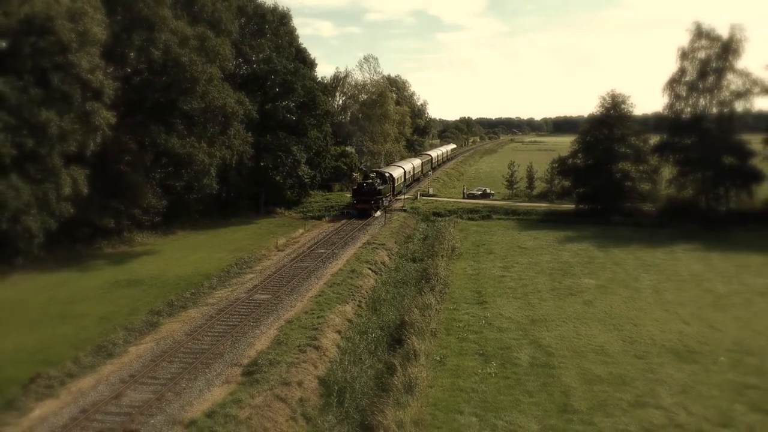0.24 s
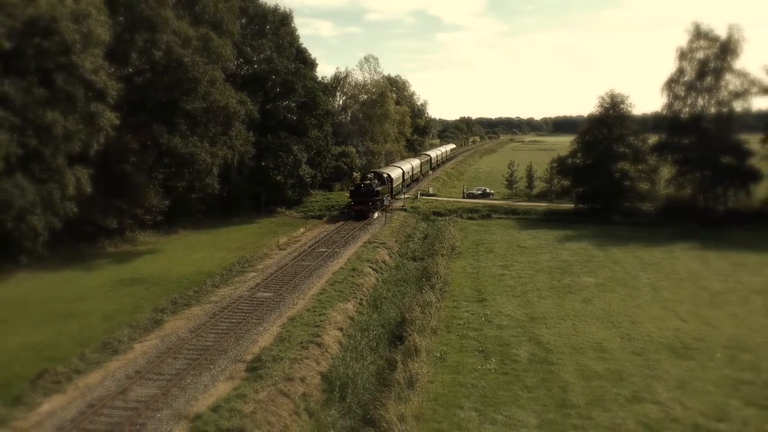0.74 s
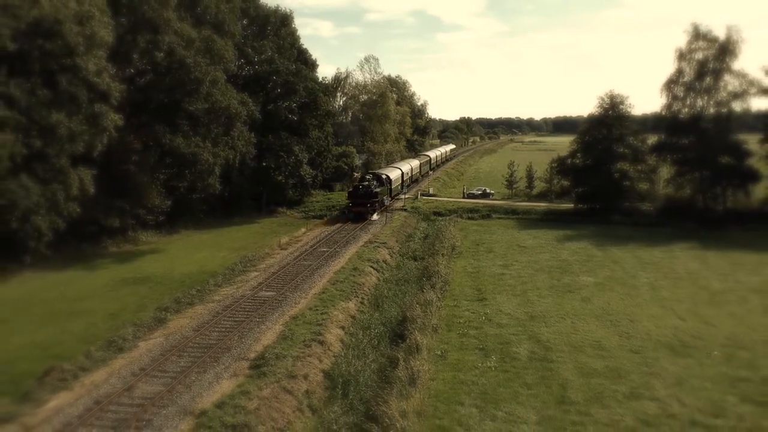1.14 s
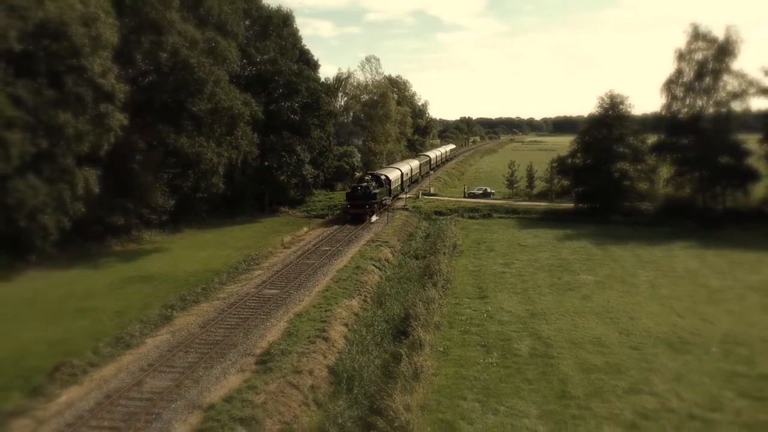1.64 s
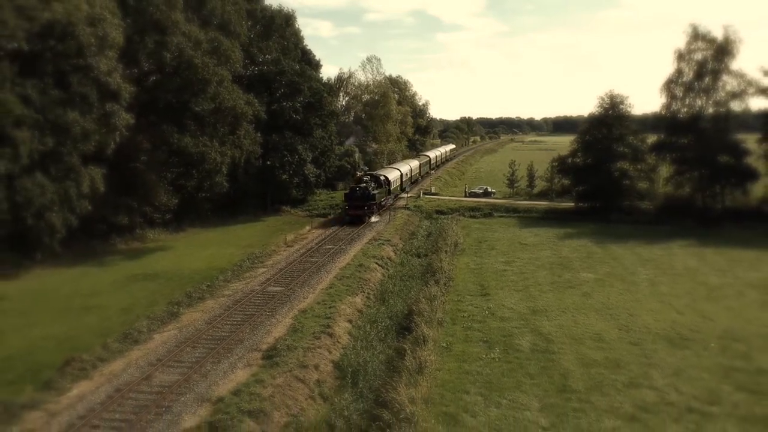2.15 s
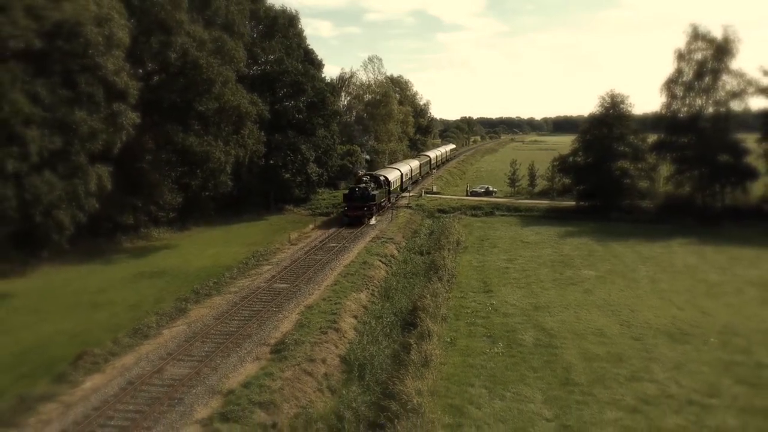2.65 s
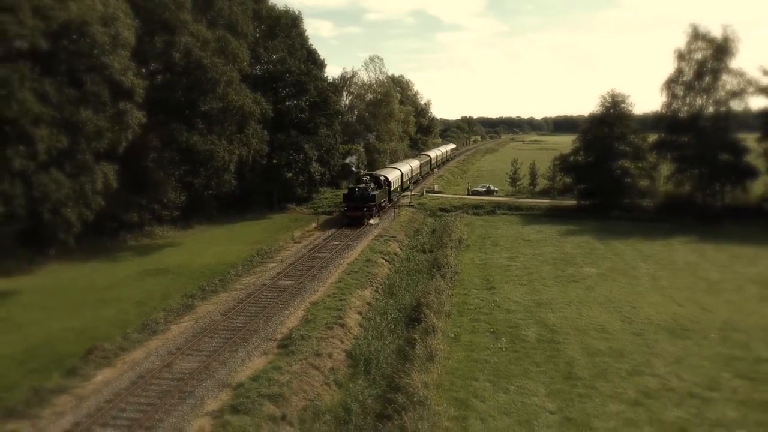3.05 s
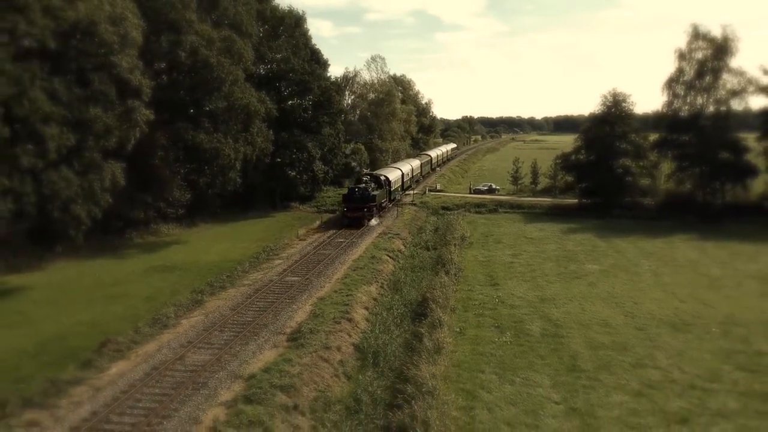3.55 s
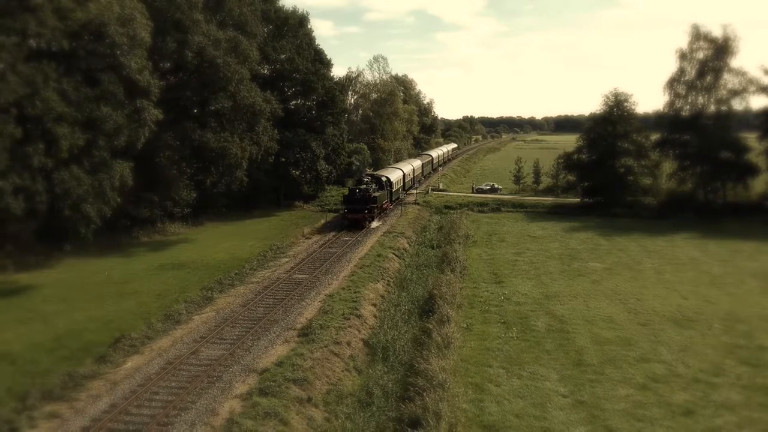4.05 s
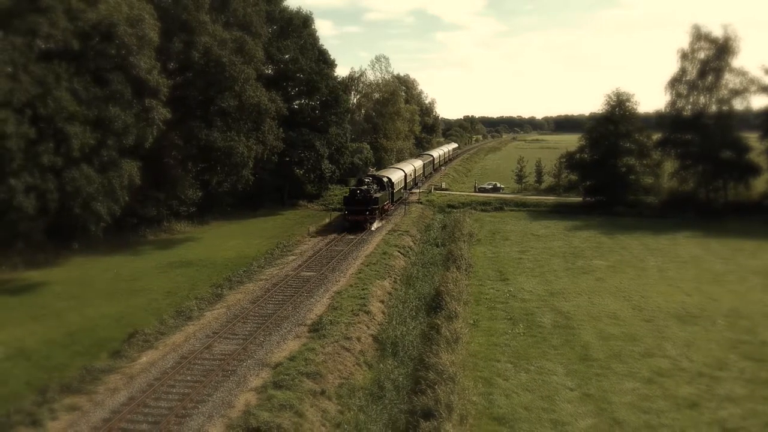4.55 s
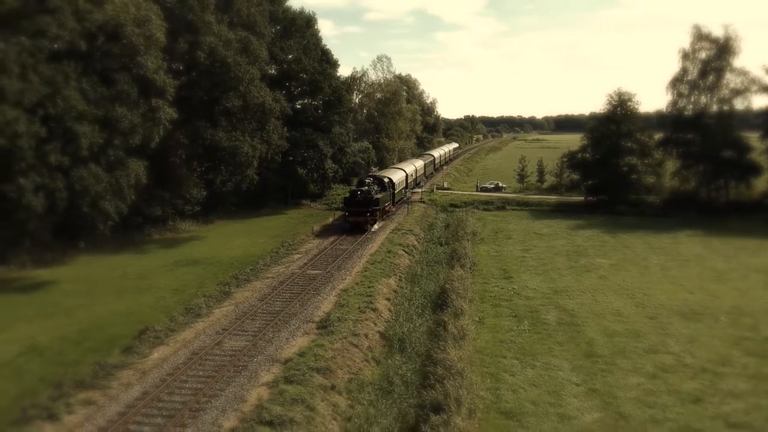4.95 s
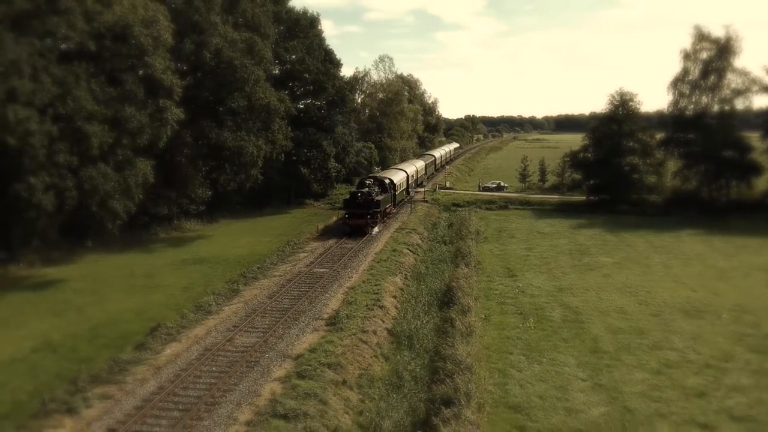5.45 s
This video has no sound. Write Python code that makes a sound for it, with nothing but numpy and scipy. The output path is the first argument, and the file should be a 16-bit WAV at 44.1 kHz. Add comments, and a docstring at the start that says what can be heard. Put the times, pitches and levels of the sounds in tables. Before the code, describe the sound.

A steam locomotive works steadily in open country, already puffing fast at about six beats a second and quickening very slightly. Each four-beat group is uneven. Bright hiss and low rumble never stop; deeper booms swell from two seconds, and heavy thuds join after four. Two widely spaced trackside microphones: the right is nearer and clearer, the left later, duller and more diffuse.

```python
"""A steam locomotive works along a line in open country, two widely spaced microphones by the track.
It opens at six exhaust beats a second, four unequal ones to a wheel turn, and slowly gains speed.
Each beat is shaped noise: a spit of steam, a turbulent blast up the chimney, then a late swinging boom.
Hissing leaks and rumble last throughout; booms swell from 2 s, heavy thuds join after 4 s.
The right microphone is nearer; the left hears it later, duller and more scattered."""
import sys
import numpy as np
from scipy import signal
from scipy.fft import rfft, irfft, next_fast_len
from scipy.io import wavfile
from scipy.ndimage import uniform_filter1d, map_coordinates

SR = 44100
rng = np.random.default_rng(int(sys.argv[2]) if len(sys.argv) > 2 else 0)


def output_pcm(signal):
    """Save a mono or channel-first signal as 16-bit PCM at the path in sys.argv[1].

    Samples are clipped to [-1, 1] before scaling.
    """
    pcm = np.clip(np.atleast_2d(signal).T, -1, 1) * 32767
    wavfile.write(sys.argv[1], SR, np.round(pcm).astype(np.int16))


N = 251811
T = np.arange(N) / SR  # seconds
SIZE = 2 * next_fast_len(N // 2 + 1, True)  # samples in a transform
FREQS = np.maximum(np.arange(SIZE // 2 + 1) * SR / SIZE, 1)  # Hz

# The four unequal strokes of one wheel turn. Each row: lateness in seconds, length in seconds at the
# mean beat time, accents in dB of boom, chuff and steam spit, accent in dB of the leak just before it.
WHEEL_STROKES = [(0.0, 0.16, 1.7, 0.7, 0.1, 1.3), (.002, 0.1446, -2, -1.2, -1.3, -0.4),
                 (.005, 0.1633, 1.8, 2.04, 4, 1.47), (.012, .137, 0.3, 0.1, 2.6, -2.5)]
# The driving wheels gather speed evenly.
FIRST_BEAT_S, BEAT_HZ, SPEEDUP_HZ_PER_S = -.076, 6.039, .05
LENGTHEN_PER_S = 0.044  # share by which the beats grow longer each second
BEAT_SCATTER_DB, PITCH_SCATTER = 0.7, .03  # chance differences from beat to beat

SCENE_S = N / SR
BEAT = np.arange(int(BEAT_HZ * SCENE_S + SPEEDUP_HZ_PER_S * SCENE_S ** 2 / 2) + 1)
STROKE_OF_BEAT = np.array(WHEEL_STROKES)[BEAT % len(WHEEL_STROKES)]
LATE, LENGTHS, BOOM_ACCENT, CHUFF_ACCENT, SPIT_ACCENT, LEAK_ACCENT = STROKE_OF_BEAT.T
# the time at which the steadily quickening wheel has counted each beat
SPEED_AT_BEAT = np.sqrt(BEAT_HZ ** 2 + 2 * SPEEDUP_HZ_PER_S * BEAT)
ONSETS = FIRST_BEAT_S + LATE + (SPEED_AT_BEAT - BEAT_HZ) / SPEEDUP_HZ_PER_S


def exhaust():
    """The jet spits first, then the blast tears up the chimney; the smokebox booms last."""
    # Colours of the parts of a beat. Each row: frequency in Hz, relative level in dB per Hz.
    body_colour = [(150, -13.5), (230, -2), (300, -0.5), (360, -2), (430, -2), (510, -5), (680, -50),
                   (1200, -46)]
    blast_colour = [(300, -26.5), (500, 1.5), (700, -1.5), (900, -2.5), (1100, -5.5), (1350, -11.5),
                    (1900, -17), (3500, -33)]
    rasp_colour = [(900, -2.5), (1500, -0.5), (1850, -2.5), (2250, 0), (2800, -5.5), (3600, -5),
                   (6000, -9.5)]
    spit_colour = [(2000, -11.5), (3500, -12.5), (5000, -5.5), (6500, -2), (7800, 3), (10000, -2),
                   (12500, -9.5), (15800, -25)]
    # Slow course of each part, before its lift and accents. Each row: time in seconds, level in dB.
    body_level = [(0, -34.5), (.55, -32.5), (1.6, -33.5), (2.05, -31), (2.3, -31), (2.75, -25), (3.4, -26),
                  (3.85, -32), (4.2, -28.5), (5.0, -22.5), (5.65, -31.5)]
    blast_level = [(0, -31.5), (.95, -26.5), (1.65, -27.5), (2.08, -34), (2.45, -27), (2.85, -27),
                   (3.1, -31.5), (3.7, -29), (4.3, -28), (5.3, -28.5), (5.7, -31)]
    rasp_level = [(0, -43), (.95, -41), (2.2, -36.5), (3.9, -37.5), (4.3, -36), (5.7, -35)]
    spit_level = [(0, -32.5), (.4, -29), (.8, -32.5), (1.6, -30), (2.25, -27.5), (3.0, -30.5),
                  (3.95, -31.5), (4.3, -27.5), (5.7, -31)]
    # Slow drift of the chimney's two resonances. Each row: time in seconds, nominal pitch in Hz.
    body_pitch = [(0, 439.7), (.6, 399.5), (1.1, 359), (1.3, 305), (1.6, 369.2), (1.9, 250.2), (2.8, 399.9),
                  (3.1, 320.5), (3.8, 295), (4.05, 409.3), (5.0, 359), (5.7, 322)]
    blast_pitch = [(0, 679.5), (1.5, 752), (1.95, 901.7), (2.3, 686.6), (3.15, 616.5), (3.55, 788.2),
                   (4.5, 719), (5.4, 851.8), (5.7, 660.2)]
    body_db = strength(body_level, CHUFF_ACCENT)
    blast_db = strength(blast_level, 0.31 * CHUFF_ACCENT)  # the blast differs less between strokes
    rasp_db = strength(rasp_level, CHUFF_ACCENT)
    spit_db = strength(spit_level, SPIT_ACCENT)
    tearing_db = 1.37 * walk(130)  # the eddies shake rasp, blast and body together

    spit_puffs = puffs(spit_db + 4.0, lag=-0.012, crest=0.31, sharp=3.1)
    spit = turbulence(colour(spit_colour), spit_puffs * undb(1.36 * walk(140)))
    rasp_puffs = puffs(rasp_db + 4.0, lag=-0.011, crest=0.42, sharp=2.5)
    rasp = turbulence(colour(rasp_colour), rasp_puffs * undb(tearing_db + 1.24 * walk(60)))

    # the chimney's resonances sit higher or lower from beat to beat
    blast = bent(turbulence(colour(blast_colour), 0.88), per_beat(curve(blast_pitch)) / 740)
    blast = blast + blast_grain()
    body = bent(turbulence(colour(body_colour), 0.98), per_beat(curve(body_pitch)) / 350)
    blast_puffs = puffs(blast_db + 3.0, lag=-0.0067, crest=.32, sharp=2.98)
    blast = blast * blast_puffs * undb(tearing_db + 1.0 * walk(50))
    body_puffs = puffs(body_db + 3.5, lag=-0.0032, crest=0.28, sharp=1.97)
    body = body * body_puffs * undb(0.42 * tearing_db)
    return spit + rasp + blast + body + smokebox()


def blast_grain():
    """Narrow, fluttering noise bands colour the blast, at a random pitch in every beat."""
    # Each row: typical pitch in Hz, level in dB before the envelope of the blast.
    grain_bands = [(480, -10.5), (850, -11.5)]
    pitch_spread, flutter_hz = .17, 69.95  # spread of the log pitch; rate of the flutter
    beat_now = np.maximum(np.searchsorted(ONSETS, T) - 1, 0)
    out = 0
    for hz, db in grain_bands:
        beat_hz = hz * np.exp(pitch_spread * rng.standard_normal(len(BEAT)))
        phase = 2 * np.pi * np.cumsum(beat_hz[beat_now]) / SR
        bands = [walk(flutter_hz) * np.cos(phase) + walk(flutter_hz) * np.sin(phase) for _ in range(2)]
        out = out + undb(db) * np.array(bands)
    return out


def smokebox():
    """Each beat sets the gas in smokebox and chimney swinging at an unsteady pitch, amid low turbulence."""
    # Each row: frequency in Hz, relative level in dB per Hz.
    boom_colour = [(50, -38), (85, -13.5), (120, -6), (165, -6), (195, -6), (240, -22), (400, -69)]
    # Each row: time in seconds, level in dB before accents and mix.
    boom_level = [(0, -29), (.3, -30.5), (.72, -31.5), (.95, -30.5), (1.25, -30.5), (1.9, -22), (2.7, -23),
                  (2.9, -18.5), (3.85, -17), (4.5, -24), (5.1, -23.5), (5.65, -31)]
    # Slow drift of the swing. Each row: time in seconds, pitch in Hz before chance wavering.
    boom_pitch = [(0, 130), (1.1, 128), (2.1, 150), (3.7, 146), (4.55, 116), (5.0, 144), (5.7, 136)]
    lag_s = 0.0098 - .0035 * BOOM_ACCENT  # builds up late, and later after a weak stroke
    swell = puffs(strength(boom_level, BOOM_ACCENT), lag=lag_s, crest=0.34, sharp=3.22)
    hz = per_beat(curve(boom_pitch))
    phases = [2 * np.pi * np.cumsum(hz * (1 + .12 * walk(110))) / SR for _ in range(2)]
    swing = np.sin(np.array(phases))
    return swing * swell * undb(3.0) + turbulence(colour(boom_colour), swell * undb(-3.0))


def hollows():
    """Now and then a brief hollow note sounds amid the rushing steam."""
    # Each row: centre in seconds, pitch in Hz, width in Hz, level in dB.
    hollow_notes = [(0.304, 2640, 600, -42), (0.474, 2696, 700, -38), (0.624, 2250, 520, -39.5),
                    (0.784, 2380, 545, -38), (0.956, 2600, 600, -35), (1.29, 2200, 450, -36),
                    (1.435, 2220, 450, -35.5), (2.328, 1828, 450, -35), (4.24, 1512, 550, -30.5),
                    (4.89, 1902, 650.2, -31.5), (5.498, 2330, 120, -43)]
    half_s = 0.059  # from the centre to 1/e^2 of the amplitude
    out = 0
    for centre_s, hz, width, db in hollow_notes:
        swell = np.exp(-2 * ((T - centre_s) / half_s) ** 2)
        out = out + turbulence(resonance(hz, width), undb(db) * swell)
    return out


def leak():
    """Steam escapes at the cylinders as a bright hiss, fluttering with the strokes and wavering in pitch."""
    # Each row: frequency in Hz, relative level in dB per Hz.
    jet_colour = [(1500, -37), (3300, -17), (4500, -8.5), (6000, -2.5), (7700, 2.5), (9000, 0.5),
                  (11000, -6), (13000, -13), (15800, -25)]
    # Each row: time in seconds, level in dB before stroke accents and lift.
    leak_level = [(0, -32), (.8, -31.5), (1.1, -31.5), (1.4, -30.5), (2.2, -28.5), (3.3, -28.5),
                  (3.9, -30.5), (4.5, -28.5), (4.9, -27.5), (5.2, -26.5), (5.7, -25)]
    lead_s = 0.024  # the leak is heard in the gap this long before a beat
    jet = bent(turbulence(colour(jet_colour), 0.97), 1 + .02 * walk(14))
    stroke_db = np.interp(T, ONSETS - lead_s, LEAK_ACCENT)
    flutter_db = 0.7 * walk(35) + 1.0 * walk(160)
    return jet * undb(curve(leak_level) + stroke_db + 2.5 + flutter_db)


def running_gear():
    """Wheels rumble and surge with each piston thrust; rods and rims grind and ring, louder with effort."""
    # Colours of rumble and grinding. Each row: frequency in Hz, relative level in dB per Hz.
    rumble_colour = [(15, -50), (27, -39), (40, -8.5), (56, -5.5), (75, 3.5), (100, 0.5), (135, -4.5),
                     (170, -6.5), (230, -21), (400, -62)]
    grind_colour = [(120, -45), (220, -12), (450, -9.5), (650, -8.5), (1100, -9), (1800, -16.5),
                    (3000, -12), (6000, -43)]
    # Rolling and piston thuds before their common lift. Each row: time in seconds, level in dB.
    roll_level = [(0, -38), (.65, -38.5), (1.45, -35), (1.9, -37.5), (2.2, -28), (2.65, -30), (3.1, -31.5),
                  (3.5, -29), (3.9, -31), (4.3, -30.5), (5.3, -27.5), (5.7, -35.5)]
    thud_level = [(0, -44), (2.3, -39.5), (3.9, -40), (4.45, -24.5), (4.9, -29.5), (5.3, -25), (5.7, -46)]
    # Ringing of wheels and motion. Each row: frequency in Hz, width in Hz, relative level in dB.
    ring_modes = [(304.7, 26, 1.5), (420, 56, -7), (519, 40, -2), (1030, 90, -13), (1130, 40, -6),
                  (1507, 54, -9.5), (1945, 53, -13.5), (2250, 76, -15.5), (3310, 20, -12)]
    thuds = puffs(strength(thud_level, BOOM_ACCENT), lag=0.013, crest=0.27, sharp=3.0)
    rolling = undb(curve(roll_level) + 1.1 * walk(14))
    rumble = turbulence(colour(rumble_colour), np.hypot(rolling, thuds) * undb(5.5))
    effort_db = curve([(0, -4.5), (2.5, 0.5), (5.7, 3)])
    grind = turbulence(colour(grind_colour), undb(effort_db - 42.5 + 1.4 * walk(20)))
    ring = 0
    for hz, width, db in ring_modes:
        # every mode swells and fades on its own
        mode_gain = undb(effort_db + db - 45.0 + 2.2 * walk(9))
        ring = ring + turbulence(resonance(hz, width), mode_gain)
    return rumble + grind + ring


def microphones(straight, scattered):
    """The near one hears the straight sound; the far one a late, weaker, drifting blend with the scatter."""
    # Far microphone against the near, before drift. Each row: frequency in Hz, level in dB.
    far_colour = [(25, -6), (60, -.8), (125, 0.4), (200, -4), (400, -7), (1000, -6.3), (2400, -7.5),
                  (4400, -12), (7500, -14), (10000, -9), (15000, -6)]
    # Each row: frequency in Hz, share (0-1) of the far amplitude that comes straight.
    straight_share = [(60, 0.6), (150, 0.77), (600, 0.87), (2000, 0.49), (8000, 0.29)]
    # Bass, middle and treble drift in the moving air. Each row: time in seconds, level in dB.
    bass_drift = [(0, 5), (1.8, 5), (2.3, -2), (2.75, 5), (3.3, -3.5), (5.3, -2), (5.6, 4.5)]
    middle_drift = [(0, 2.5), (.45, -3), (1.4, -1), (2.2, 2.5), (2.8, -1), (3.65, 1), (4.05, -2.5),
                    (4.8, -1.5), (5.7, 2)]
    treble_drift = [(0, 0), (.45, -4.5), (.8, 0.5), (1.4, 2.5), (2.1, -0.5), (2.8, 0), (3.2, -1.3),
                    (3.7, 1.5), (4.4, -1), (5.0, .5), (5.7, -1)]
    far_lag_s = .0173
    share = np.clip(over_hz(straight_share), 0, 1)
    blend = share * rfft(straight, SIZE) + np.sqrt(1 - share ** 2) * rfft(scattered, SIZE)
    blend = blend * undb(over_hz(far_colour))
    bass = over_hz([(180, 0.95), (330, 0.061)])
    treble = over_hz([(1800, 0.22), (4500, 1)])
    bands = bass, 1 - bass - treble, treble
    drifts_db = curve(bass_drift), curve(middle_drift), curve(treble_drift)
    far = sum(irfft(blend * band)[:N] * undb(db) for band, db in zip(bands, drifts_db))
    far = np.pad(far, (int(far_lag_s * SR), 0), mode="reflect")[:N]
    return np.array([far, straight])  # left, right


def puffs(beat_db, lag, crest, sharp):
    """Pressure of all beats: each swells as the valve opens, crests at a share of its length and drains."""
    power = np.zeros(N)
    lengths = LENGTHS * (1 + LENGTHEN_PER_S * (ONSETS - ONSETS.mean()))
    for start, length, db in zip(ONSETS + lag, lengths, beat_db):
        span = slice(*np.searchsorted(T, [start, start + 2 * length]))
        age = np.maximum(T[span] - start, 0) / (crest * length)  # 1 at the crest
        power[span] += (undb(db) * (age * np.exp(1 - age)) ** sharp) ** 2
    return np.sqrt(power)


def strength(rows, accent_db):
    """Level of every beat in dB: the slow course, the accent of its stroke and a little chance."""
    chance_db = BEAT_SCATTER_DB * rng.standard_normal(len(BEAT))
    return np.interp(ONSETS, *np.transpose(rows)) + accent_db + chance_db


def per_beat(hz):
    """A pitch that lies a little higher or lower in each beat and glides to the next."""
    offsets = rng.standard_normal(len(BEAT))
    return hz * (1 + PITCH_SCATTER * np.interp(T, ONSETS + LENGTHS / 2, offsets))


def turbulence(gain, envelope):
    """Noise of a given colour and loudness, as two rows: the straight sound and its unrelated scatter."""
    even_gain = gain / np.sqrt(np.mean(gain ** 2))
    return irfft(rfft(rng.standard_normal((2, SIZE))) * even_gain)[:, :N] * envelope


def bent(sound, ratio):
    """The sound played at a moving speed, which carries its resonances up and down."""
    place = np.cumsum(ratio) % (N - 1)
    return np.array([map_coordinates(row, [place], order=3, mode="mirror") for row in sound])


def resonance(hz, width):
    """Gain per frequency of a single resonance, its width in Hz taken at half amplitude."""
    return 1 / (1 + (2 * (FREQS - hz) / width) ** 2)


def colour(rows):
    """Gain per frequency of a (Hz, dB) spectrum, falling away past its ends."""
    low_fall = np.minimum(FREQS / rows[0][0], 1) ** 2
    high_fall = np.minimum(rows[-1][0] / FREQS, 1) ** 2
    return undb(over_hz(rows)) * low_fall * high_fall


def over_hz(rows):
    """Rows (Hz, value) joined on a log-frequency axis."""
    hz, value = np.transpose(rows)
    return np.interp(np.log(FREQS), np.log(hz), value)


def curve(rows):
    """Rows (s, value) joined by straight lines."""
    return np.interp(T, *np.transpose(rows))


def walk(rate):
    """Random levels held 1 / rate s and smoothed twice over that time; scaled to a spread of 1."""
    hold = max(int(SR / rate), 1)
    steps = np.repeat(rng.standard_normal(N // hold + 1), hold)
    smooth = uniform_filter1d(uniform_filter1d(steps, hold), hold)[:N]
    return smooth / smooth.std()


def undb(db):
    """Decibels to gain."""
    return 10 ** (np.asarray(db) / 20)


def scene():
    """Exhaust beats over leaking steam and the rolling train, heard by both microphones."""
    straight, scattered = exhaust() + hollows() + leak() + running_gear()
    return microphones(straight, scattered)


def record(dry):
    """The recorder cuts the top with a steep low-pass."""
    top_hz = 15700
    low_pass = signal.ellip(10, .1, 80, top_hz, fs=SR, output="sos")  # 0.1 dB ripple, 80 dB stop
    return signal.sosfilt(low_pass, dry)


dry = scene()
out = record(dry)
output_pcm(out)
```